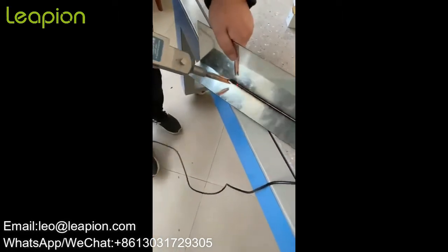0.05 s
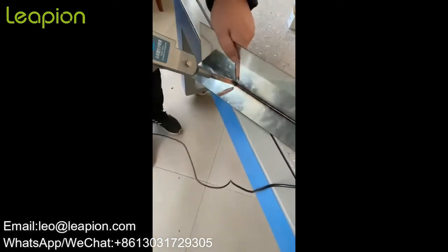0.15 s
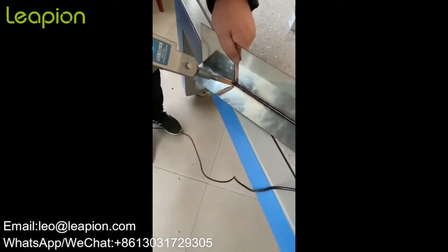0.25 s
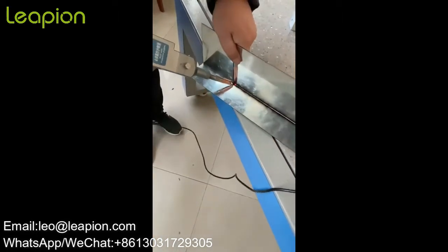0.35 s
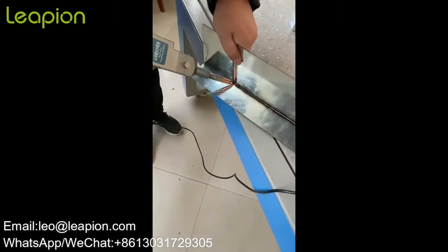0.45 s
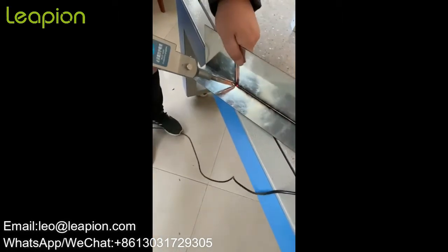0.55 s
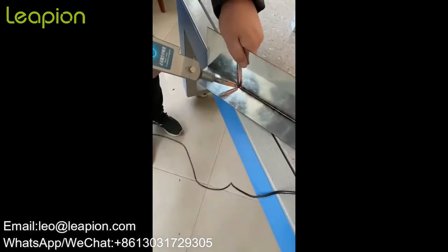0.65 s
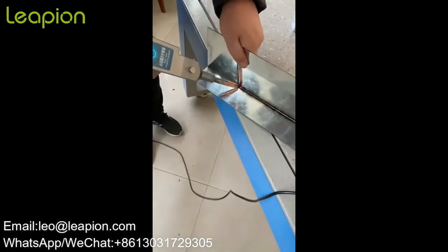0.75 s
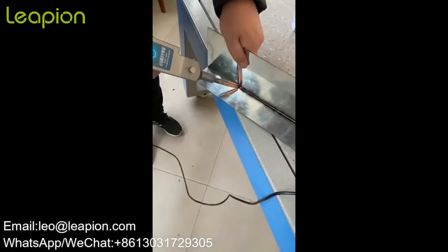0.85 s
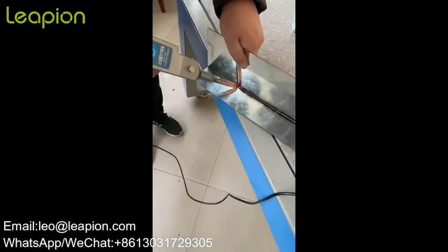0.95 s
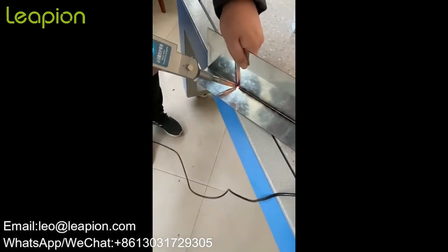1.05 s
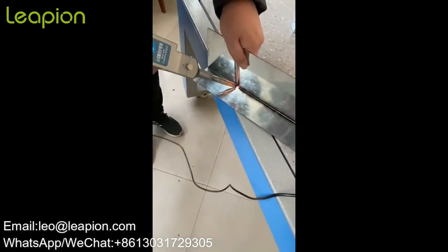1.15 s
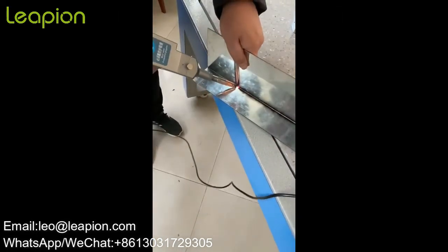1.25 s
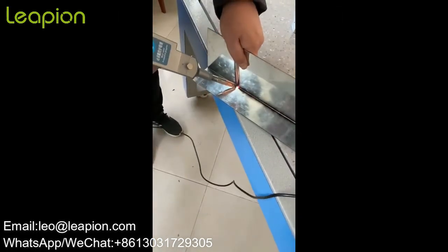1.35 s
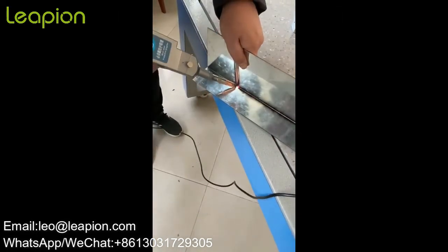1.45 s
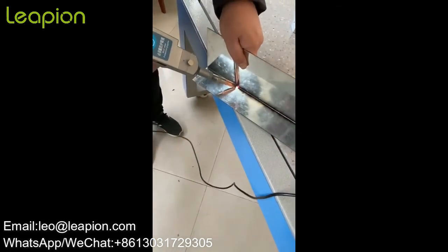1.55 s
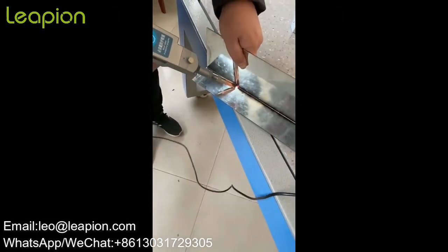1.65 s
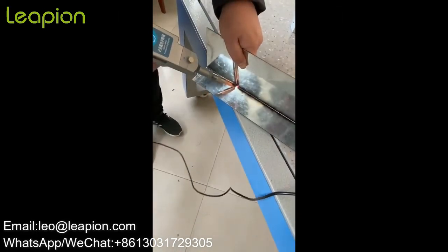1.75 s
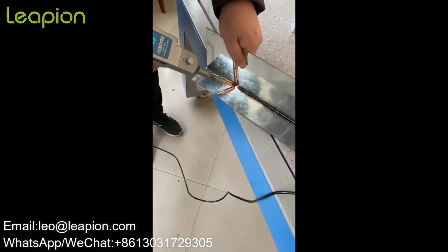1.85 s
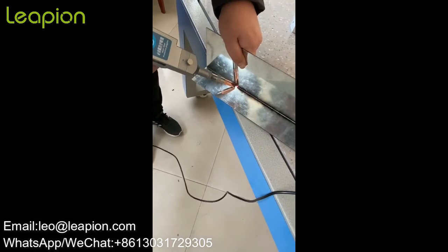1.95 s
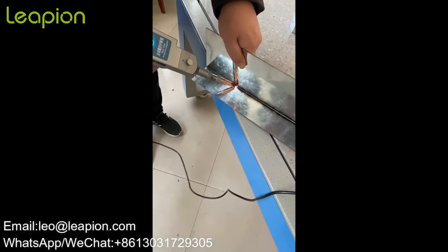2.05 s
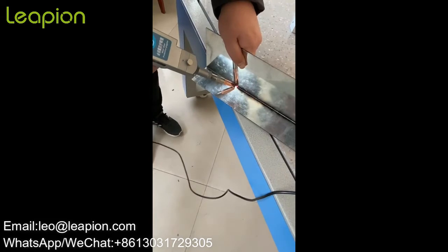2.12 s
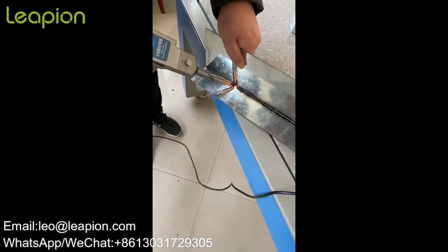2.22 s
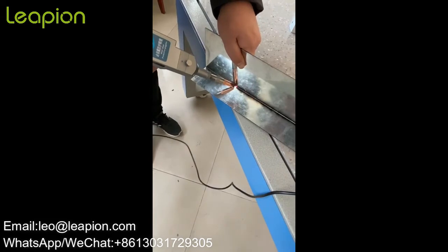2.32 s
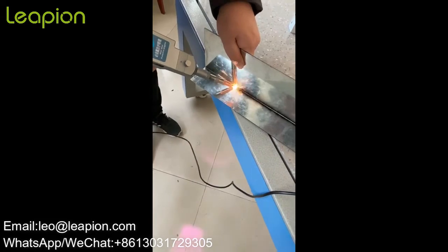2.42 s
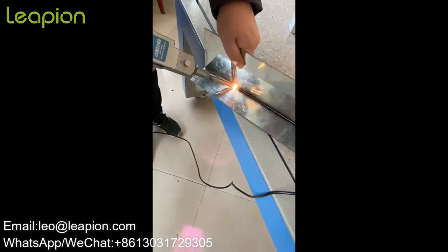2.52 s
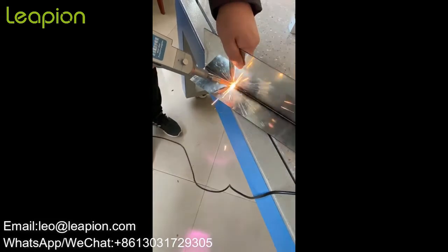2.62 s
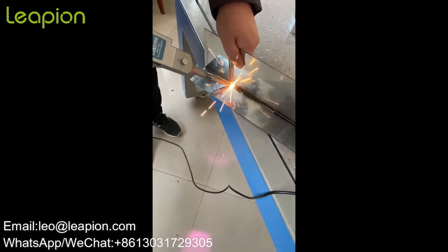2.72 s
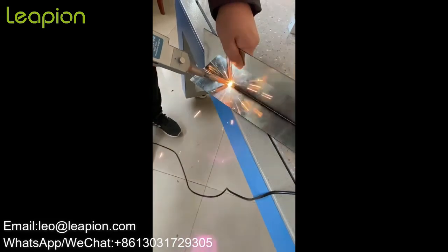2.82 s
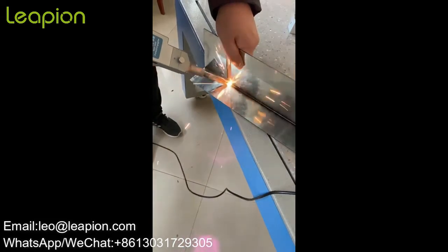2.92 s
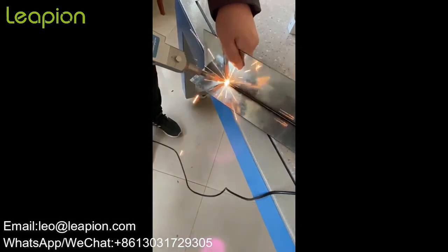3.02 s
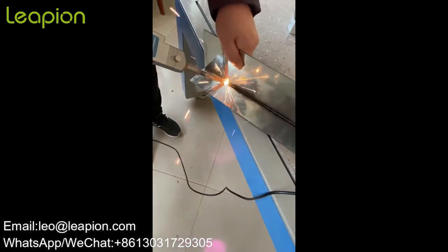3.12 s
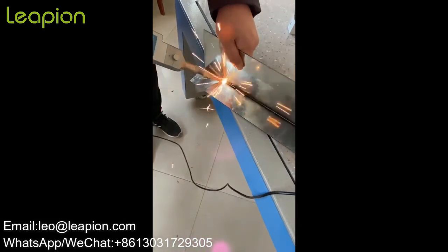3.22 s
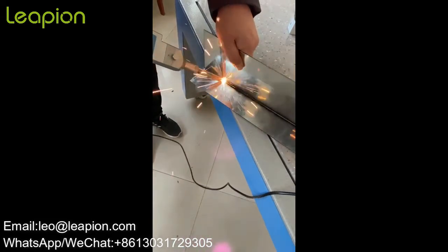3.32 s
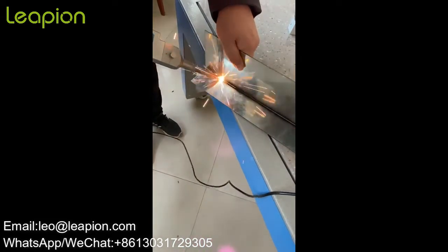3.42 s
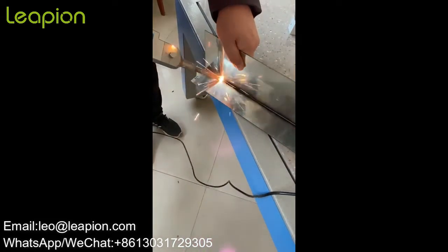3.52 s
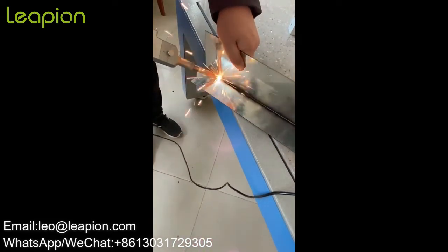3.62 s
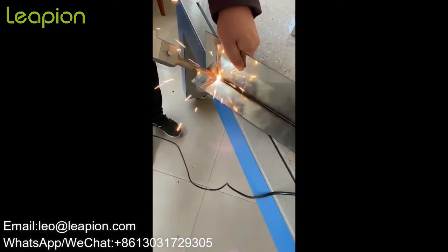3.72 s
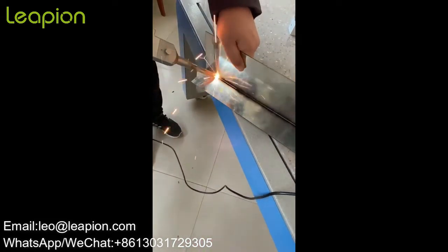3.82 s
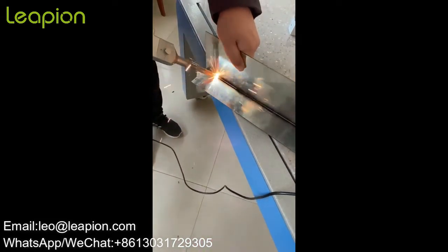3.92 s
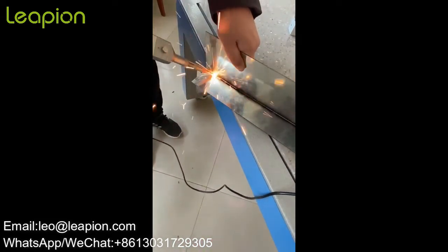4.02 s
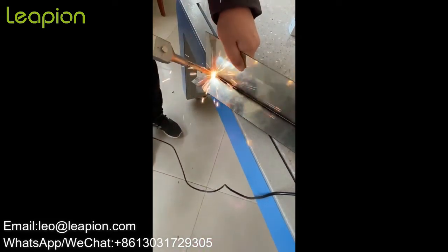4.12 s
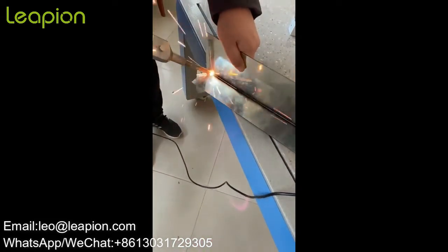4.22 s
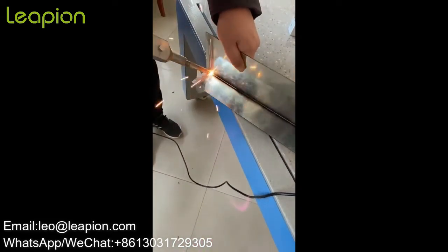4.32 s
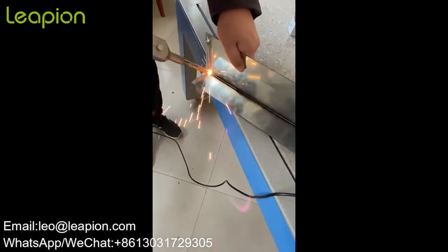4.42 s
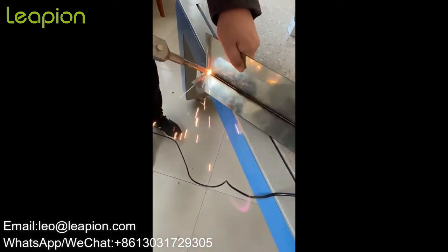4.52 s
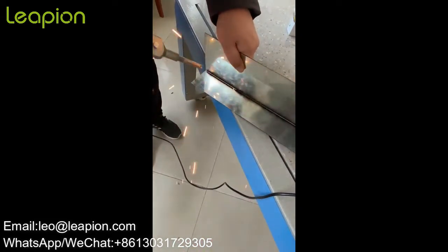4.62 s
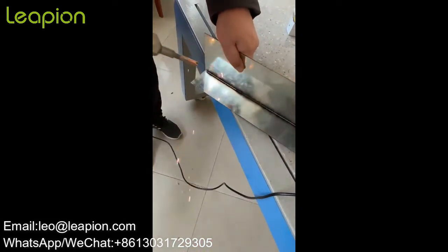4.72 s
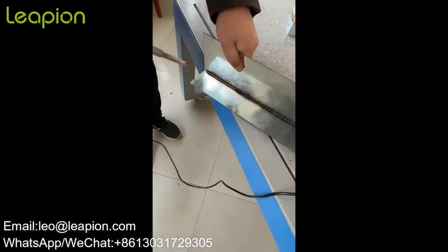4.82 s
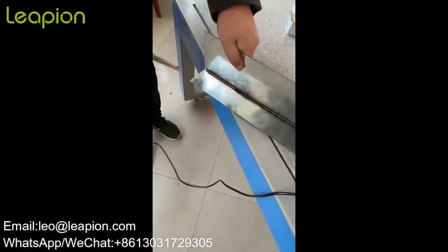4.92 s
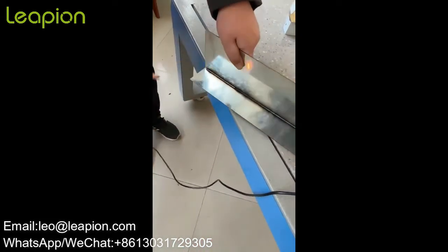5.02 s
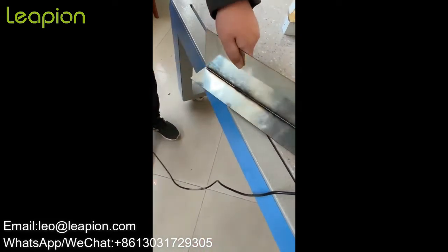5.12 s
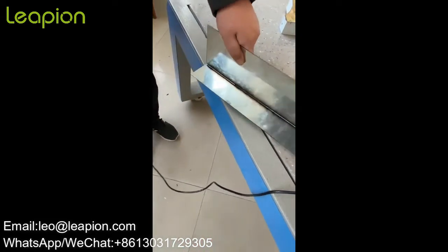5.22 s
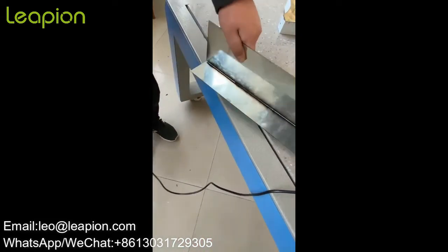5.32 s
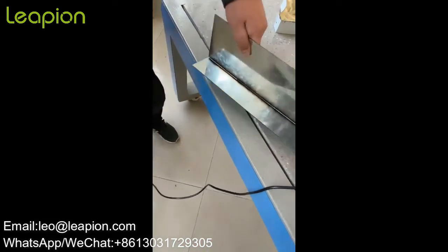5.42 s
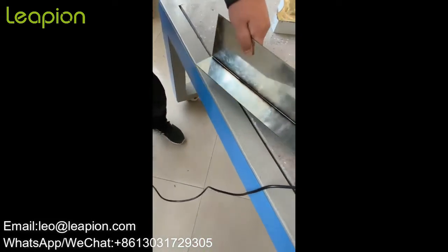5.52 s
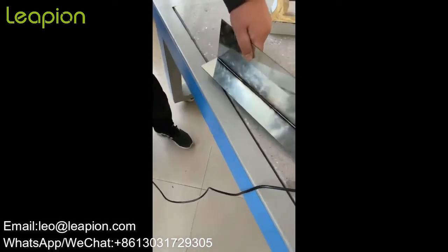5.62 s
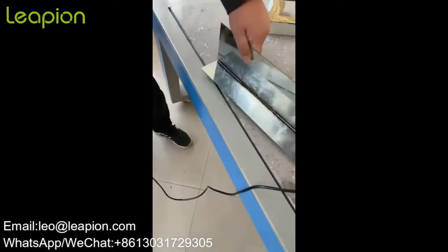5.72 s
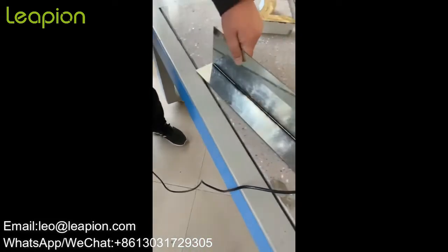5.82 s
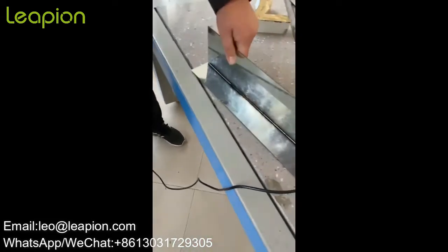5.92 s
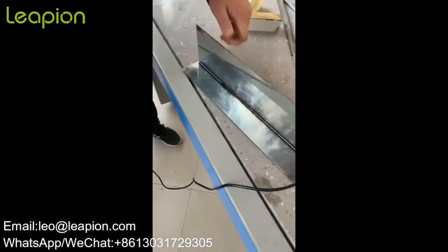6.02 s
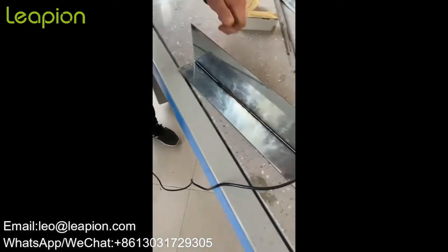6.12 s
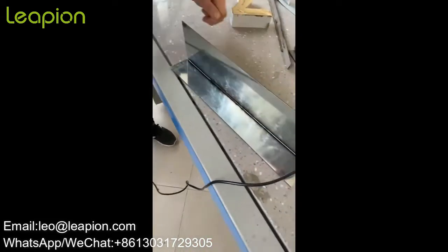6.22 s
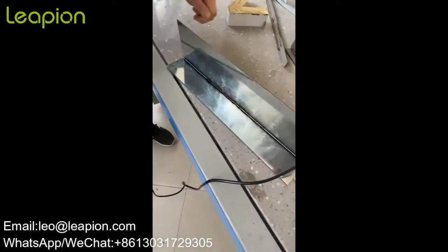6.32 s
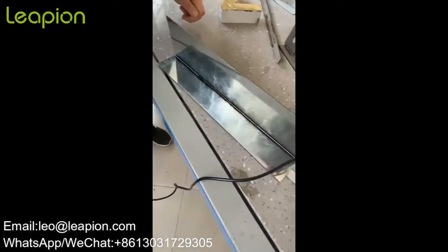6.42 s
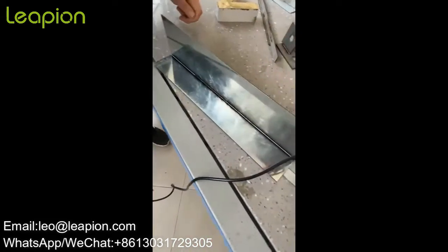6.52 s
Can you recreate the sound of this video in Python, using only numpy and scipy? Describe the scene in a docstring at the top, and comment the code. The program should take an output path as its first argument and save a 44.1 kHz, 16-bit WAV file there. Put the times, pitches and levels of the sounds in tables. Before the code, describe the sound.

A close stereo microphone in a small workshop with quiet ventilation and wavering hum. A welding torch knocks down on a metal jig and settles in small rattles. After a quiet pause a valve clicks, gas hisses, and a loud, bright, fast-throbbing sizzle bursts on for about two seconds. It cuts off to a weak whistling hiss; then sheet metal scrapes, rustles and knocks under a thin broken whistle.

```python
"""A handheld laser welder runs along a sheet-metal seam: its swinging beam boils the metal in fast throbs.
A valve lets shielding gas hiss through the resonant nozzle, before, under and after the boiling.
The torch is set down on the jig; later the workpiece is knocked, dragged and rustled, built from dying modes and noise.
A thin, broken whistle sags after the weld. Ventilation noise and wavering machine hum lie behind it all.
Two microphone ports hear each source with its own phase lead."""
import sys
import numpy as np
from scipy import signal
from scipy.fft import rfft, irfft
from scipy.io import wavfile
from scipy.ndimage import uniform_filter1d, minimum_filter1d

SR = 44100
rng = np.random.default_rng(int(sys.argv[2]) if len(sys.argv) > 2 else 0)


def master_out(mix):
    """Clip the mix to full scale and print it as 16-bit PCM to the path in sys.argv[1]."""
    frames = np.transpose(np.atleast_2d(mix))
    ceiling = np.clip(frames, -1, 1)
    pcm = np.round(ceiling * 32767).astype(np.int16)
    wavfile.write(sys.argv[1], SR, pcm)


def volts_from_decibels(level):
    """Turn decibel levels (scalar or array-like) into linear amplitude factors."""
    exponent = np.asarray(level, float) / 20
    return 10 ** exponent


N = 289296
T = np.arange(N) / SR
BEAM_ON_S, BEAM_OFF_S = 2.524, 4.664

# Gas valve opening, then shutting. Each row: time in seconds, click level in dB, pitch in Hz, t60 in seconds.
VALVE_CLICKS = [(2.354, -33, 488, 0.033), (4.994, -42, 605, 0.032)]
# Phase lead of the left port for the torch. Each row: frequency in Hz, lead in radians.
TORCH_LEAD = [(0, 0), (700, 0), (1800, -.9), (2500, -1.9), (2900, -3.1), (3300, -3.4), (3800, -4.7),
              (4500, -4.6), (5300, -6.2)]
# Phase lead of the left port for handling sounds. Each row: frequency in Hz, lead in radians.
HAND_LEAD = [(0, 0), (900, 0.7), (3000, 1.0), (5300, 0.35)]
# How alike the ports hear the torch. Each row: frequency in Hz, likeness from 0 to 1, left minus right in dB.
TORCH_PAIR = [(100, .99, 0), (800, .7, 4), (1500, .7, 0), (2200, .7, -5), (3100, .93, -1), (3600, .7, 0),
              (5500, .7, -2), (6900, .99, 0), (7700, .99, 0), (8200, .6, -2), (9700, .99, 0),
              (11000, .995, 0), (11900, .55, 0), (12600, .999, 0), (14400, .999, 0), (15100, .6, 0)]
# How alike the ports hear shop and handling. Each row: frequency in Hz, likeness from 0 to 1, left minus right in dB.
SHOP_PAIR = [(40, .995, 0), (150, .99, 0), (300, .9, 1), (700, .85, 3), (1500, .3, 3), (2700, .8, 2),
             (4700, .45, 0), (7000, .99, 0), (8300, .99, 0), (9000, .4, 0), (10500, .99, 0), (12000, .5, 0),
             (12700, .999, 0), (15500, .6, 0)]


def evened(x):
    """Scales so that the sum heard in the middle has rms 1."""
    return x / np.sqrt(np.mean(np.atleast_2d(x).mean(0) ** 2) + 1e-20)


def read(points, hz, axis=1):
    """Reads a table column against log frequency."""
    table = np.transpose(points)
    return np.interp(np.log(hz + 1), np.log(table[0] + 1), table[axis])


def slow(rate):
    """Chance of rms 1 that wanders at about the given rate per second."""
    length = int(SR / rate)
    return evened(uniform_filter1d(uniform_filter1d(rng.standard_normal(N), length), length))


def held(on, off, rise, fall):
    """Gain 1 from on to off, with slopes in dB per second on either side."""
    return volts_from_decibels(-rise * np.maximum(on - T, 0) - fall * np.maximum(T - off, 0))


def humps(peaks, between_db):
    """A spectrum in dB made of resonances over a low floor."""
    def shape_db(hz):
        power = sum(volts_from_decibels(2 * db) / (1 + (2 * (hz - f) / width) ** 2) ** 1.5 for f, width, db in peaks)
        return 10 * np.log10(power + volts_from_decibels(2 * between_db))
    return shape_db


def ports(hz, lead):
    """Phase turn between the two ports: the source's own lead plus a treble lead common to all."""
    # Extra treble lead of the left port. Each row: frequency in Hz, lead in radians.
    treble_lead = [(5300, 0), (6600, 3.0), (7700, 3.15), (8400, 4.8), (9000, 5.0), (9700, 6.2),
                   (11300, 6.35), (12500, 9.35), (14700, 9.5), (15600, 11.9)]
    return np.exp(1j * (np.interp(hz, *np.transpose(lead)) + np.interp(hz, *np.transpose(treble_lead))))


def placed(x, lead):
    """A single sound reaching both ports."""
    left = irfft(rfft(x) * ports(np.fft.rfftfreq(N, 1 / SR), lead), N)
    return np.array([left, x])


def hiss(shape_db, lead, pair, patchy_db, tilt=((0, 0), (1, 0)), size=512):
    """Random short-time spectra with drifting patches, heard by both ports; tilt: (s, dB per octave)."""
    hop = size // 4
    overlap = 3 * size // 4
    frames, hz = 4 * N // size + 5, np.fft.rfftfreq(size, 1 / SR)
    a, b, c, d, patches = rng.standard_normal((frames, len(hz), 5)).T
    patches = uniform_filter1d(uniform_filter1d(patches, 6, 0), 16, 1)
    same = np.clip(read(pair, hz), 0, 1)[:, None]
    right = a + 1j * b
    left = (same * right + np.sqrt(1 - same ** 2) * (c + 1j * d)) * ports(hz, lead)[:, None]
    lean = volts_from_decibels(read(pair, hz, axis=2) / 2)[:, None]
    db = shape_db(hz)[:, None] + patchy_db * patches / patches.std()
    spectra = np.array([left * lean, right / lean]) * volts_from_decibels(db)
    flat = evened(signal.istft(spectra, nperseg=size, noverlap=overlap)[1])
    # the tilt comes after levelling and pivots at 4 kHz
    z = signal.stft(flat, nperseg=size, noverlap=overlap)[2][:, :, :frames]
    slope = np.interp(np.arange(frames) * hop / SR, *np.transpose(tilt))
    z *= volts_from_decibels(np.log2(np.clip(hz[:, None], 500, 9000) / 4000) * slope[:z.shape[2]])
    return signal.istft(z, nperseg=size, noverlap=overlap)[1][:, :N]


def melt():
    """Every swing of the beam across the seam throws a puff of vapour: a slow swell and a quick stop."""
    # Colour of the boiling. Each row: frequency in Hz, power per Hz in relative dB.
    boil_colour = [(300, -22), (1500, -20), (1900, -13), (2150, -5), (2550, -5), (3050, -2), (3270, -20),
                   (3500, -11), (3900, -7), (4600, -6), (5020, 0), (5300, -5), (5700, -7), (6800, 2),
                   (7600, -5), (9200, -2), (10800, -9), (12100, -2), (12850, -11), (13700, -3), (14900, -7),
                   (15500, 0)]
    # Tones of the swinging beam. Each row: multiple of the swing rate, level in dB against the melt.
    swing_tones = [(3, -37.5), (4, -46.5), (5, -42), (7, -42.5)]
    swing_hz, swing_s = 163.9, 3.2057  # rate, and the time of one puff's peak
    melt_db, quench_db_per_s = -19.5, 900
    run_out_s, run_out_db_per_s = 4.568, 70  # the seam ends under the beam, the boiling thins
    strike_tilt, strike_s = 2.3, 0.038  # brightness around the strike, dB per octave
    end_tilt, end_db, end_power = 5.2, 0.5, 3.9  # brighter towards the end of the seam, dB per octave

    along = np.clip((T - BEAM_ON_S) / (BEAM_OFF_S - BEAM_ON_S), 0, 1) ** end_power
    tilt = end_tilt * along + strike_tilt * np.exp(-abs(T - BEAM_ON_S) / strike_s)
    turns = swing_hz * (T - swing_s) + .5
    sizes = volts_from_decibels(2.8 * rng.standard_normal(int(N / SR * swing_hz) + 2))
    size = sizes[(turns - turns[0] // 1).astype(int)]  # one chance size per swing
    place = turns % 1 - .5
    puff = np.exp(-(place / np.where(place < 0, .22, .11)) ** 2)
    throb = np.sqrt(.47 * volts_from_decibels(2.5 * slow(45)) + 1.65 * size * puff)

    level = volts_from_decibels(melt_db + end_db * along + 0.056 * slow(26.61))
    level *= held(BEAM_ON_S, BEAM_OFF_S, 5200, quench_db_per_s)
    level *= held(0, run_out_s, 0, run_out_db_per_s)
    boil = hiss(lambda hz: read(boil_colour, hz), TORCH_LEAD, TORCH_PAIR, patchy_db=1.4,
                tilt=np.transpose([T, tilt]), size=512)
    # droplets burst out of the pool, about 220 per second
    spatter = volts_from_decibels(4.0 * np.minimum(rng.exponential(1, N), 4)) * (rng.random(N) < 220 / SR)
    grit = 1 + .12 * signal.oaconvolve(spatter, np.exp(-np.arange(90) / 20.))[:N]
    tones = 0
    for k, db in swing_tones:
        tone = np.sqrt(2) * np.cos(2 * np.pi * (k * turns + rng.random()))
        tones = tones + volts_from_decibels(db) * tone * volts_from_decibels(1.8 * slow(15))
    return level * (boil * throb * grit + tones)


def gas():
    """Turbulent flow coloured by the nozzle's pipe resonances; clear of the seam the jet whistles."""
    # Nozzle resonances. Each row: frequency in Hz, width in Hz, level in dB.
    nozzle = [(2120, 150, -4.5), (2330, 60, -5), (2600, 350, -9), (3060, 60, 2), (4430, 190, -7),
              (6020, 160, -4), (6500, 200, -11), (6950, 280, 3), (7350, 250, -10), (8150, 350, -6),
              (9970, 220, -10), (11320, 200, -9), (12000, 450, -8), (13150, 500, -9), (13750, 300, -11),
              (15400, 450, -9)]
    # Jet whistles. Each row: frequency in Hz, peak level in dB before it flickers.
    jet_tones = [(3060, -45), (4430, -55), (6020, -54)]
    jet_waver = .009  # share by which the pitch wavers
    flow_db, fill_s = -38, 0.051
    seep_s, seep_db = 2.333, -21  # gas seeps just before the valve opens
    burst_db = -13  # the sudden part of the flow as the valve snaps open
    lift_db, lift_tilt, lift_s = -10, 1.5, 0.077  # the torch is lifted away; tilt in dB per octave
    shut_db_per_s = 333

    opens, shuts = VALVE_CLICKS[0][0], VALVE_CLICKS[1][0]
    tilt = [(BEAM_OFF_S, 0), (BEAM_OFF_S + lift_s, lift_tilt)]
    flow = hiss(humps(nozzle, -21), TORCH_LEAD, TORCH_PAIR, patchy_db=1.2, tilt=tilt, size=1024)
    filled = volts_from_decibels(seep_db) + (T > opens) * volts_from_decibels(burst_db) + 1 - np.exp(-np.maximum(T - opens, 0) / fill_s)
    lifted = volts_from_decibels(lift_db * np.clip((T - BEAM_OFF_S) / lift_s, 0, 1))
    jet = 0
    for hz, db in jet_tones:
        flicker = volts_from_decibels(db + 7.7 * slow(45))
        turn = 2 * np.pi * np.cumsum(hz * (1 + jet_waver * slow(34.8))) / SR
        jet = jet + flicker * np.sin(turn)
    free = held(BEAM_OFF_S + lift_s, shuts, shut_db_per_s, shut_db_per_s) * placed(jet, TORCH_LEAD)
    return volts_from_decibels(flow_db) * filled * lifted * held(seep_s, shuts, 3500, shut_db_per_s) * flow + free


def ring(modes, chance, rise, rattle_db=0):
    """Dying sines, a little different at each blow, each able to flutter on its own; peak 1."""
    t = T[:SR // 2]
    length = int(.006 * SR)  # flutter smoothing
    flutter = rng.standard_normal((len(modes), len(t)))
    flutter = uniform_filter1d(uniform_filter1d(flutter, length), length)
    flutter /= flutter.std()
    out = 0
    for (hz, db, t60), c, f in zip(modes, chance, flutter):
        level = volts_from_decibels(db + 2.5 * c + rattle_db * f - 60 * t / t60)
        out = out + level * np.sin(2 * np.pi * hz * (1 + .008 * c) * t)
    out *= 1 - np.exp(-t / rise)
    return out / abs(out).max()


def add(mix, s, sound):
    """Mixes a sound in at time s."""
    part = mix[round(s * SR):][:len(sound)]
    part += sound[:len(part)]


def blows():
    """Each blow rings jig or workpiece, bench and thin sheet, with a dull smack and a bright crack; the valve clicks."""
    # The torch is set down on the jig and settles. Each row: time in seconds, knock, weight, smack and tick in dB
    # (tick before its ring and crack are weighed), lean of the ring in dB per octave.
    settling = [(0.145, -24, -46, -39.5, -39, 1.5), (0.172, -33, -46, -44, -59, -4.5),
                (0.224, -37.5, -61, -56, -62, 1), (0.244, -40.5, -57, -62, -58, 0),
                (0.291, -42.5, -51, -45, -54, 12), (0.306, -51, -55, -54, -59, 7),
                (0.354, -44, -61, -47.5, -47.5, 6), (0.459, -47.5, -60, -56.5, -60.5, 5)]
    # Blows on the workpiece, the first row being the low thump of the gas valve shutting. Each row: time in
    # seconds, knock, weight, smack and tick in dB (tick before its ring and crack are weighed), lean of the
    # ring in dB per octave.
    knocks = [(4.992, -44.5, -41, -45, -59, -7), (5.324, -47, -46, -65, -44.5, 0),
              (5.656, -36, -50, -66, -34, -30), (5.705, -36, -60, -40, -20, -5),
              (5.76, -34, -50, -70, -66, 2), (5.808, -44, -60, -60, -25, 14),
              (5.845, -23.5, -29.5, -30, -29.5, -5)]
    # Modes of the jig. Each row: frequency in Hz, level in dB before the lean, t60 in seconds.
    jig = [(88, -7, .12), (194, -9, .35), (393, -14, .2), (484, -12, .18), (754, -2, .1), (850, 0, .035),
           (947, -2, .04), (1276, -13, .09), (1860, -14, .06), (2020, -6, .04), (2245, -17, .06)]
    # Modes of the workpiece. Each row: frequency in Hz, level in dB before the lean, t60 in seconds.
    workpiece = [(458, -19, .07), (588, -6, .14), (640, -4, .07), (748, 0, .26), (1010, -12, .04),
                 (1233, -17, .1), (1710, -17, .07), (2013, -19, .055)]
    # Modes of the bench. Each row: frequency in Hz, level in dB, t60 in seconds.
    bench = [(138, 4, 0.051), (208, -6.5, 0.12), (350, -13.5, 0.24)]
    # Modes of the thin sheet. Each row: frequency in Hz, level in dB before the tilt, t60 in seconds.
    thin_sheet = [(2229, -12, .06), (4230, -5, .06), (5470, -3, .05), (6040, -8, .07), (6760, -3, .06),
                  (10300, 0, .045), (11000, -3, .05), (12500, -8, .04), (15000, -8, .04)]
    rattle_jig_db, rattle_workpiece_db = 4, 2  # loose parts rattle, so every mode flutters
    stop_s = .008  # the ring is damped as the next contact comes
    tick_tilt, tilt_per_db = -3.5, 0.09  # dB per octave; the more tick over knock, the brighter

    out, t = np.zeros(N), T[:SR // 2]
    hz = np.fft.rfftfreq(len(t), 1 / SR)
    # broad humps around the modes
    sheet = sum(volts_from_decibels(db) / (1 + 2j * (hz - f) * t60 / 40) for f, db, t60 in thin_sheet)
    struck = [(jig, rattle_jig_db, row) for row in settling]
    struck += [(workpiece, rattle_workpiece_db, row) for row in knocks]
    nexts = [row[0] for *_, row in struck[1:]] + [T[-1]]
    for (modes, rattle_db, (s, knock_db, weight_db, smack_db, tick_db, lean)), until in zip(struck, nexts):
        free = np.clip((until - s - t) / stop_s, .2, 1)
        leaning = [(f, db + lean * np.log2(f / 750), t60) for f, db, t60 in modes]
        tilt = tick_tilt + tilt_per_db * (tick_db - knock_db)
        thin = [(f, db + tilt * np.log2(f / 6000), t60) for f, db, t60 in thin_sheet]
        chance = rng.standard_normal((3, len(jig)))
        noise = rfft(rng.standard_normal((2, len(t))))

        smack = evened(irfft(noise[0] / (1 + (hz / 2800) ** 4)))
        smack = smack * volts_from_decibels(-60 * t / .07) * (1 - np.exp(-t / .0005))
        crack = evened(irfft(noise[1] * sheet * volts_from_decibels(tilt * np.log2(hz / 6000 + 0.38))))
        crack = crack * volts_from_decibels(-60 * t / 0.054) * (1 - np.exp(-t / 0.0001))
        knock = free * ring(leaning, chance[0] / 2, 0.0011, rattle_db)
        weight = ring(bench, chance[1], 0.0031)
        tick = .6 * ring(thin, chance[2], .0002) + .5 * crack
        add(out, s, volts_from_decibels(knock_db) * knock + volts_from_decibels(weight_db) * weight)
        add(out, s, volts_from_decibels(smack_db) * smack + volts_from_decibels(tick_db) * tick)
    for s, db, f, t60 in VALVE_CLICKS:
        modes = [(f, 0, t60), (1.7 * f, -9, t60 / 2), (3.3 * f, -10, t60 / 2)]
        add(out, s, volts_from_decibels(db) * ring(modes, (0, 0), .0004))  # two chances: only the first two modes sound
    return out


def drag():
    """The workpiece dragged along its rest: rubbing noise that rings in the hollow workpiece."""
    # Hollow tones of the workpiece. Each row: frequency in Hz, width in Hz, level in dB.
    hollow = [(447, 71, 3.5), (820, 170, 3), (1670, 320, -3), (2750, 300, -3)]
    start_s, end_s, level_db = 5.22, 5.34, -51.5
    rub = hiss(humps(hollow, -58), HAND_LEAD, SHOP_PAIR, patchy_db=2.2, size=1024)
    return volts_from_decibels(level_db) * held(start_s, end_s, 104, 76) * rub


def rustle():
    """Hands, feet and cable moving: soft scraping in clumps of short grains."""
    # Movements. Each row: start in seconds, length in seconds, level in dB before the clumps,
    # treble tilt in dB per octave.
    movements = [(0, 0.027, -56, -2), (0.132, 0.19, -52.5, 0), (0.62, 0.071, -64.5, -1),
                 (4.934, 1.59, -56.5, -1.5), (5.27, 0.48, -56, 0.5), (5.885, 0.044, -47.5, -1.5)]
    # Colour of the scraping. Each row: frequency in Hz, power per Hz in relative dB.
    scrape_colour = [(150, 6.5), (700, 7), (1400, -6.5), (2200, 2.5), (3200, -3), (4500, -7.5), (7000, 1.5),
                     (8300, -19), (10500, -10.5), (15500, -26)]
    in_db_per_s, out_db_per_s = 500, 141
    each = np.array([volts_from_decibels(db) * held(s, s + length, in_db_per_s, out_db_per_s)
                     for s, length, db, _ in movements])
    # about 150 grains per second
    grains = volts_from_decibels(3.0 * np.minimum(rng.exponential(1, N), 4)) * (rng.random(N) < 150 / SR)
    clumps = 1 + .15 * signal.oaconvolve(grains, np.exp(-np.arange(800) / 150.))[:N]
    moving = np.sqrt((each ** 2).sum(0))
    tilt = np.transpose(movements)[3] @ each ** 2 / moving ** 2  # the louder movement sets the tilt
    scrape = hiss(lambda hz: read(scrape_colour, hz), HAND_LEAD, SHOP_PAIR, patchy_db=1.2,
                  tilt=np.transpose([T, tilt]))
    return uniform_filter1d(moving, 900) * clumps * scrape


def whistle():
    """A fluttering near-sine that breaks in and out, and a fuzzy octave that flickers on its own."""
    # Sagging pitch. Each row: time in seconds, pitch in Hz before it wavers.
    pitch = [(4.7, 2345), (5.3, 2337), (5.69, 2322), (5.98, 2265), (6.115, 2245), (6.33, 2222), (6.5, 2185),
             (6.56, 2140)]
    # Bursts. Each row: start in seconds, length in seconds, level in dB before the flutter.
    peeps = [(4.82, .025, -57), (5.085, .075, -59), (5.17, .04, -62), (5.235, .07, -53), (5.365, .075, -53),
             (5.49, .055, -55), (5.565, .13, -51.5), (5.96, .035, -59), (6.107, .02, -53),
             (6.143, .016, -56), (6.18, .016, -58), (6.225, .01, -60), (6.255, .035, -52.5),
             (6.325, .018, -52), (6.4, .035, -63), (6.475, .085, -58.5)]
    # Phase lead of the left port. Each row: frequency in Hz, lead in radians.
    whistle_lead = [(0, 0), (2300, 1.2), (5300, .1)]
    edge_db_per_s, floor_db = 1100, -72
    octave_db, octave_grows_db_per_s = -77, 5
    s, hz = np.transpose(pitch)
    level = sum(volts_from_decibels(db) * held(at, at + length, edge_db_per_s, edge_db_per_s) for at, length, db in peeps)
    on = held(s[0], s[-1], edge_db_per_s, 0)
    turn = 2 * np.pi * np.cumsum(np.interp(T, s, hz) * (1 + .003 * slow(60))) / SR
    tone = (level + volts_from_decibels(floor_db) * on) * np.sin(turn) * volts_from_decibels(2.8 * slow(70))
    octave = on * volts_from_decibels(octave_db + octave_grows_db_per_s * (T - s[0]))
    octave = octave * np.sin(2 * turn + 1.3 * slow(120)) * volts_from_decibels(4.5 * slow(30))
    return placed(np.sqrt(2) * (tone + octave), whistle_lead)


def shop():
    """Broad ventilation noise and machine tones that waver in level and phase, steady throughout."""
    # Colour of the ventilation. Each row: frequency in Hz, power per Hz in relative dB.
    air_colour = [(18, -15), (30, 2), (102, -5.5), (195, -0.5), (260, -4), (552, -9.5), (698, -7),
                  (794, -6), (1650, -16), (2310, -13.5), (3590, -24.5), (4300, -18.5), (5000, -34.5),
                  (6200, -25.5), (7240, -46), (9890, -45), (15000, -48)]
    # Machine tones. Each row: frequency in Hz, level in dB against the hum, wavers per second,
    # waver depth before its level and phase parts are weighed.
    machines = [(50, -22, 10, .25), (99.5, .5, 30, .33), (191.5, -5.5, 14, .4), (421, -17.5, 4.4, .25),
                (700.4, -3.5, 12, .22), (774, -15, 8, .25)]
    # Phase lead of the left port. Each row: frequency in Hz, lead in radians.
    shop_lead = [(0, 0), (300, 0), (950, 1.2), (2500, 2.5), (4500, 2.4), (5300, .1)]
    air_db, hum_db = -57.5, -55
    air = hiss(lambda hz: read(air_colour, hz), shop_lead, SHOP_PAIR, patchy_db=1.44, size=2048)
    hum = 0
    for hz, db, rate, depth in machines:
        waver = .9 + depth * (.85 * slow(rate) + 1.3j * slow(rate))
        hum = hum + volts_from_decibels(db) * (waver * np.exp(2j * np.pi * hz * T)).real
    return volts_from_decibels(air_db) * air + volts_from_decibels(hum_db) * placed(hum, shop_lead)


def room(x):
    """Sparse taps of random sign, dying away; other taps for each port, but the bass alike in both."""
    taps = np.zeros((2, SR // 2))
    at = np.arange(300, SR // 2 - 20, 20) + rng.integers(0, 20, (2, (SR // 2 - 301) // 20))
    np.put_along_axis(taps, at, rng.choice([-1., 1.], at.shape), 1)
    taps *= volts_from_decibels(-60 * T[:SR // 2] / 0.12)  # t60 in seconds
    taps[0] += uniform_filter1d(taps[1] - taps[0], 60)
    return signal.fftconvolve(x[None], taps / np.linalg.norm(taps[0]), axes=1)[:, :N]


def scene():
    """Torch, handling and workshop together; only the blows and valve clicks get room echo."""
    hits = blows()
    handling = placed(hits, HAND_LEAD) + volts_from_decibels(-6.5) * room(hits) + drag() + rustle()
    return melt() + gas() + handling + whistle() + shop()


def roll_off(x):
    """The treble ends steeply here."""
    return signal.sosfilt(signal.butter(12, 16970, fs=SR, output="sos"), x)


def record(dry):
    """The microphone drops the deepest bass and top treble; gain control ducks lasting loudness and creeps back."""
    knee_db, wait_s, smooth_s = -29, .53, .07
    duck_db, back_db_per_s = 4, 2.5  # most it turns down, and how fast it returns
    dry = signal.sosfilt(signal.butter(2, 45, "high", fs=SR, output="sos"), dry)
    lowpass = signal.firwin(511, 15620, window=("kaiser", 9), fs=SR)
    dry = signal.oaconvolve(dry, lowpass[None], "same")
    power_db = 10 * np.log10(abs(uniform_filter1d((dry ** 2).mean(0), size=1024)) + 1e-12)
    # the quietest level of the past wait: it passes the knee only once the sound has stayed above it
    wait = int(wait_s * SR)
    lasting_db = minimum_filter1d(power_db, wait, origin=(wait - 1) // 2)
    down_db = duck_db * np.clip(lasting_db - knee_db, 0, 1)
    back = back_db_per_s * T
    down_db = np.maximum.accumulate(down_db + back) - back
    mix = dry / volts_from_decibels(uniform_filter1d(down_db, int(smooth_s * SR)))
    return roll_off(mix)


dry = scene()
out = record(dry)
master_out(out)
```